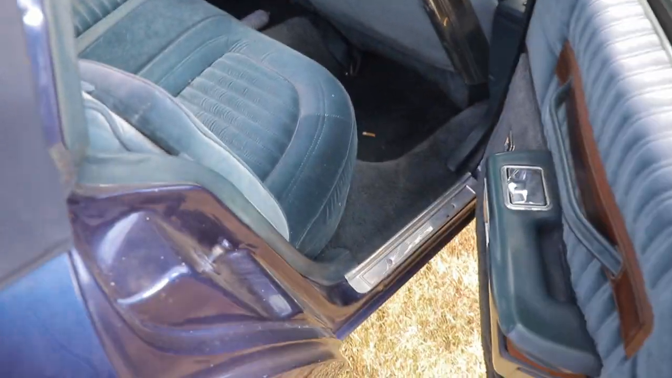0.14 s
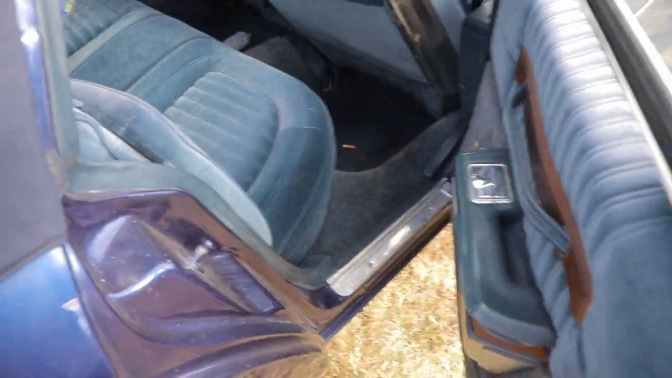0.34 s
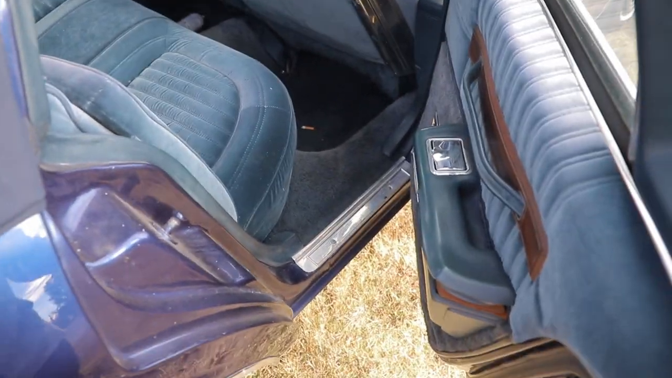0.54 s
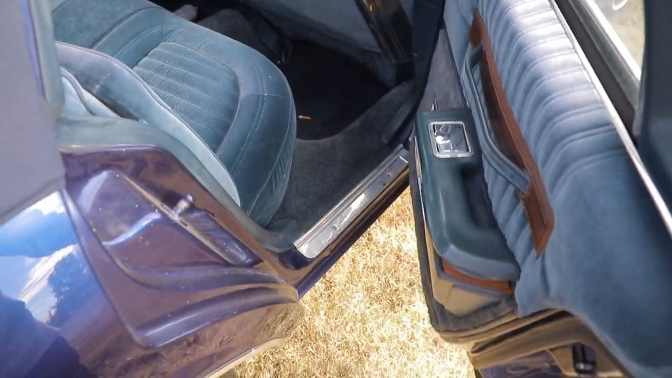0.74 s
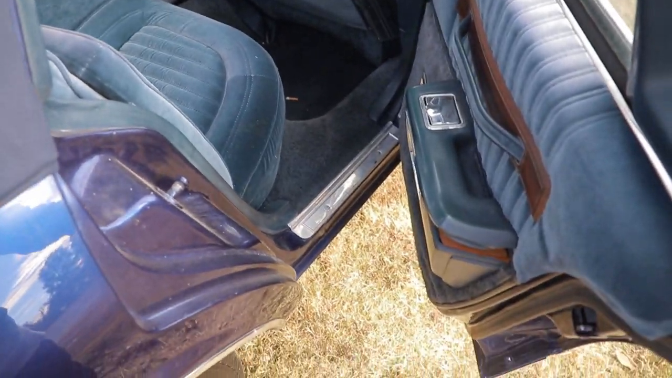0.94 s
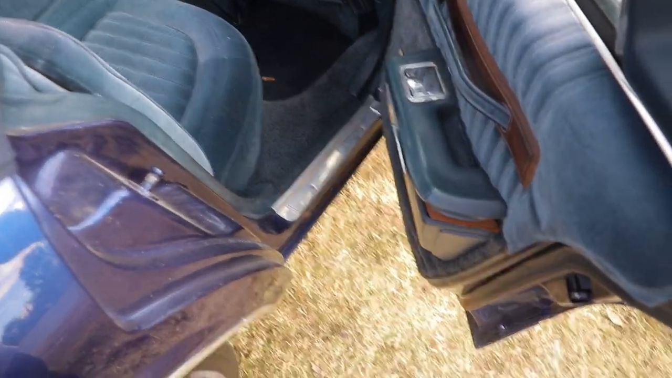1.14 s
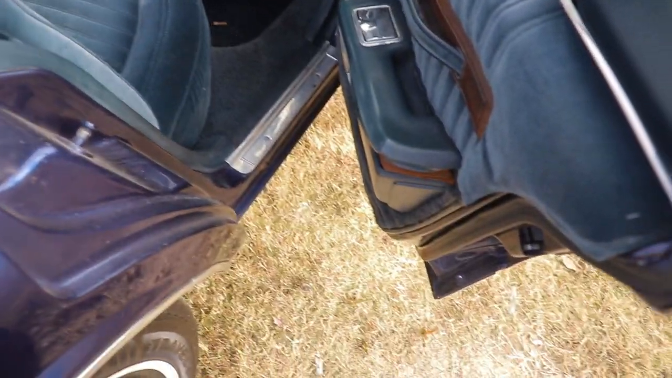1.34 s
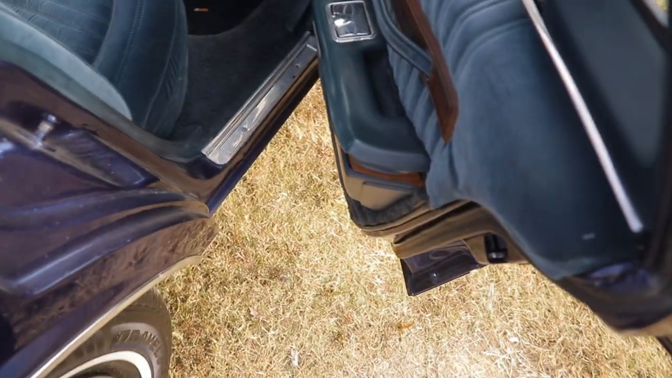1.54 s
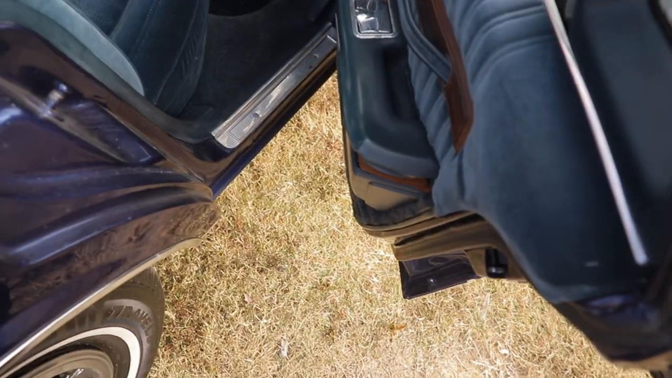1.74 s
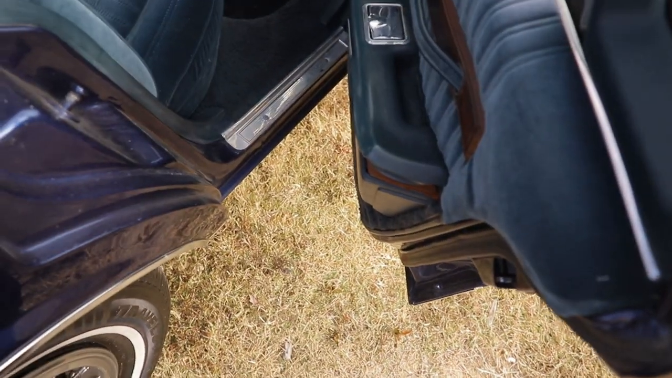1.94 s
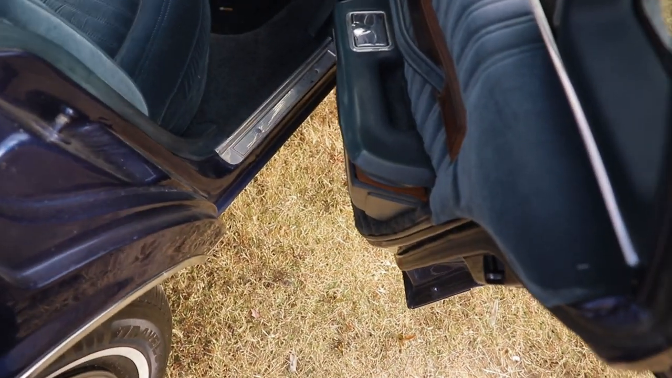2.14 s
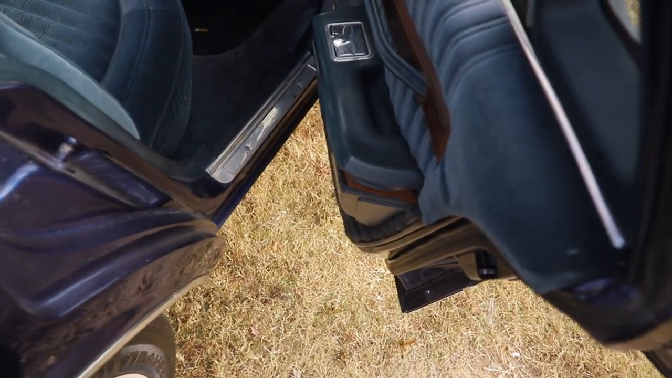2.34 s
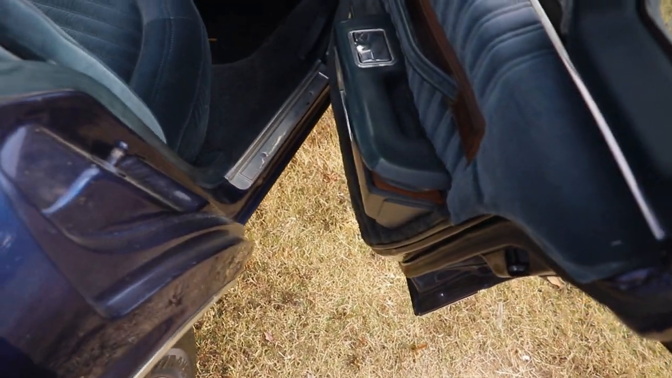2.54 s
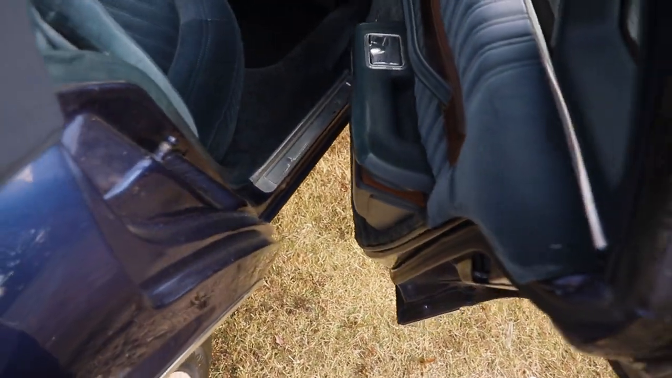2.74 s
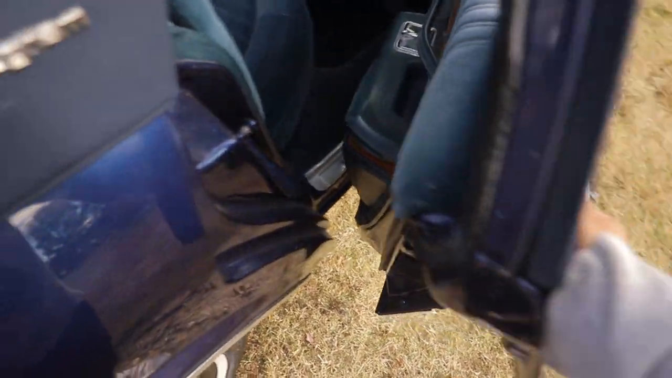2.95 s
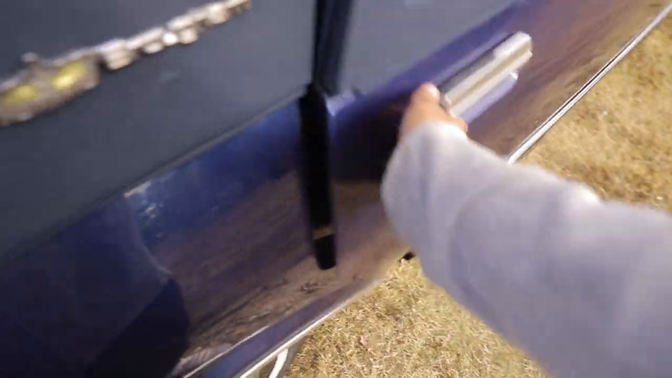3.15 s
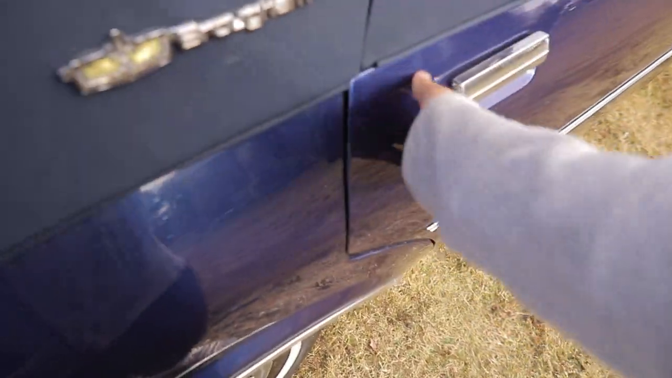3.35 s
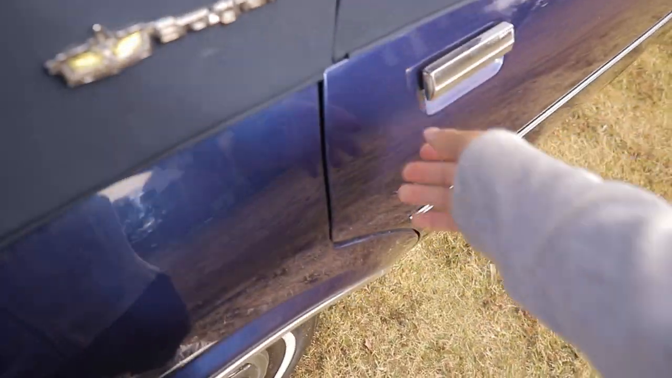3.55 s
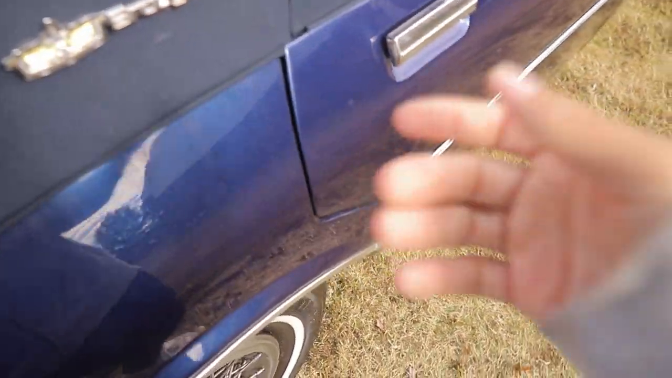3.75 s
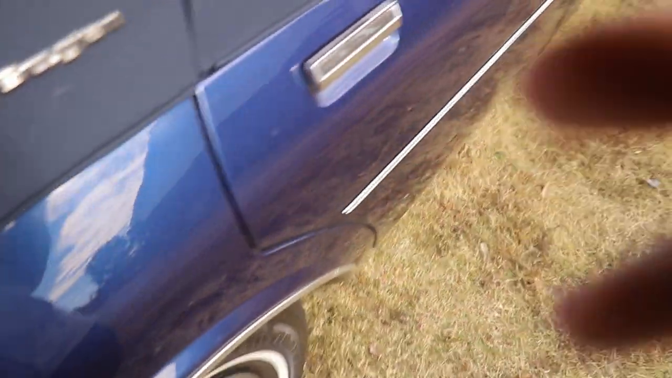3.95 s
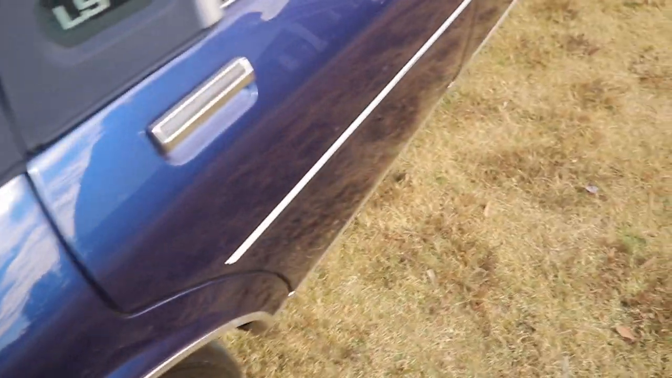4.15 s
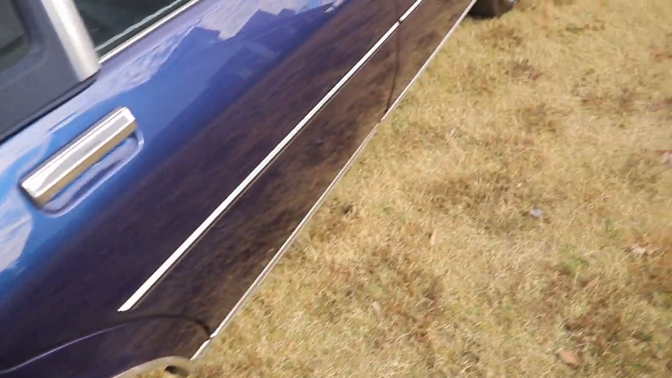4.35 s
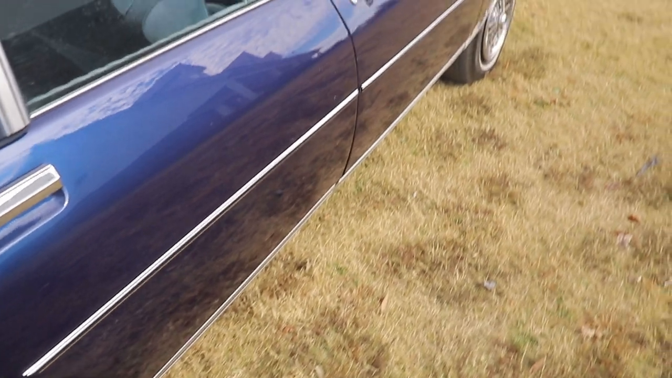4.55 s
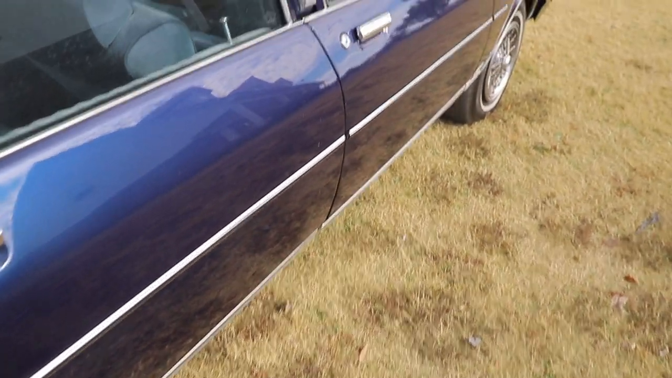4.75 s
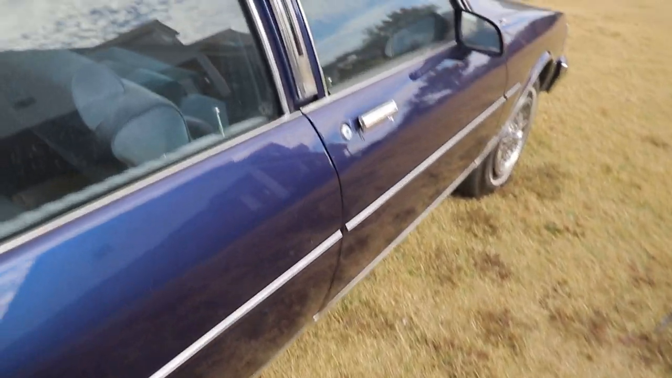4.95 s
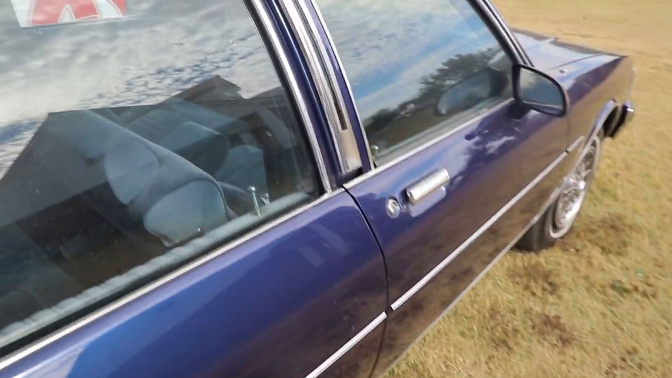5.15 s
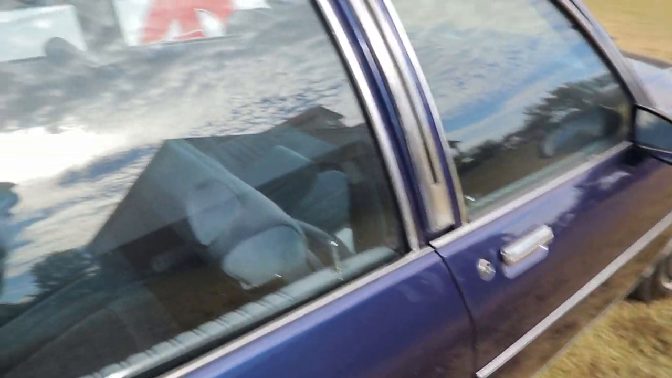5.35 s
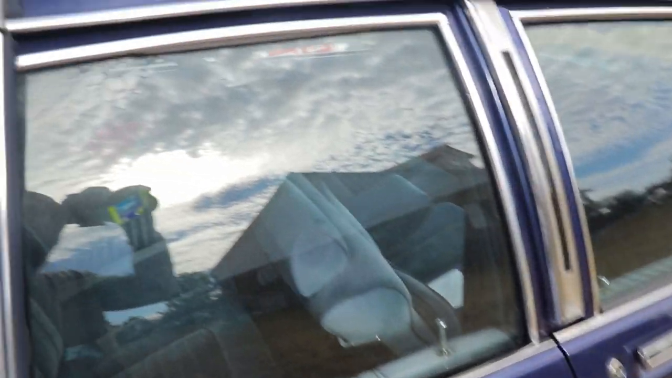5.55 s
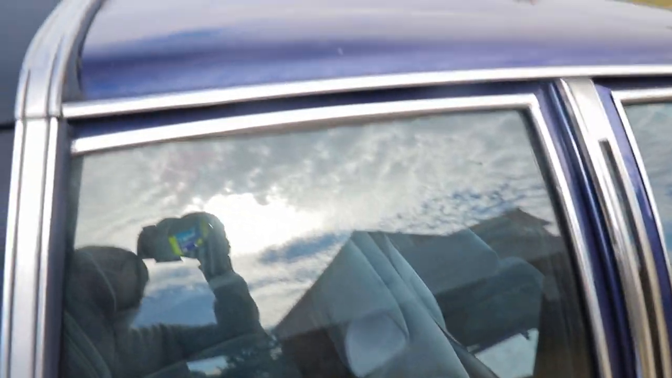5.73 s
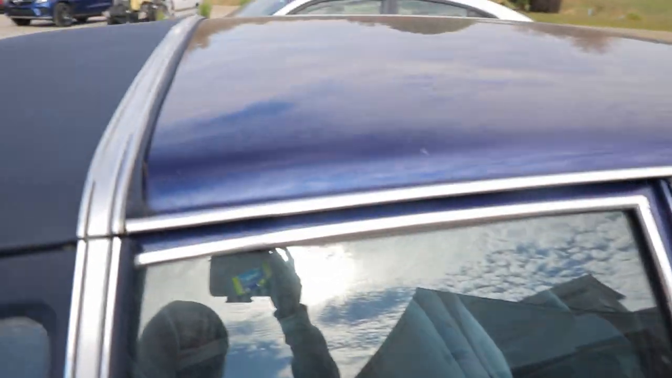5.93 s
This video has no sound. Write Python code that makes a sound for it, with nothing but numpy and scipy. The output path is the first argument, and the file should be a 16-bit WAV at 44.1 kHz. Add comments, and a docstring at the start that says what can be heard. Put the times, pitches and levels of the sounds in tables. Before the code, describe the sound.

A quiet yard with far traffic and leaves, small wind pops on a hand-held microphone, light rubbing and faint sparrow chirps. Just past the middle, a heavy old car door slams close by, overloading with a metallic clash, boomy panel thud and short yard echo. Afterwards come sharp finger knocks, sleeve rubs, stronger wind buffets and a distant bird's small whistles, with a clear chirp at the end.

```python
"""Outdoors, a far hum, traffic and leaves run throughout as steady coloured noise and wavering tones. From the
start a hand rubs a hand-held camera (grainy hiss), wind pops on its two microphone ports (short pressure swings
over rumble), sparrows chirp (fluttering glides) and fingers tap (clicks, case ring). At 3.2 s a heavy old car
door slams close by (noise clashes, panel modes, yard echo); its peaks flatten at full scale. Then a bird
whistles purer slurs, the hand knocks and rubs harder, a sleeve brushes past."""
import sys
import numpy as np
from scipy import signal
from scipy.fft import rfft, irfft, next_fast_len
from scipy.io import wavfile
from scipy.ndimage import uniform_filter1d, map_coordinates

SR = 44100
rng = np.random.default_rng(int(sys.argv[2]) if len(sys.argv) > 2 else 0)


def wav_out(sig):
    """Save sig, one row per channel (or a flat mono array), as 16-bit PCM at SR to the path in sys.argv[1]."""
    wavfile.write(sys.argv[1], SR, np.round(np.clip(np.atleast_2d(sig).T, -1, 1) * 32767).astype(np.int16))


N = 268524
TIME = np.arange(N) / SR  # s, the whole scene
RING = np.arange(SR) / SR  # s, one second for a single sound


def amp(db):
    """Decibels to gain."""
    return 10 ** (np.asarray(db) / 20)


def unit(x):
    """Scale to rms 1."""
    return x / np.sqrt(np.mean(x ** 2) + 1e-20)


def along(points, hz):
    """Read a curve of (Hz, value) points on a log frequency axis."""
    point_hz, value = np.transpose(points)
    return np.interp(np.log(hz + 1), np.log(point_hz + 1), value)


def wobble(rate):
    """A smooth random curve, rate knots a second."""
    knots = rng.standard_normal(int(N * rate / SR) + 4)
    return map_coordinates(knots, [TIME * rate])


def filtered(x, response):
    """Shape x by a response given as a function of frequency in Hz."""
    n = x.shape[-1]
    padded = next_fast_len(n + 8192)
    spectrum = rfft(x, padded) * response(np.fft.rfftfreq(padded, 1 / SR))
    return irfft(spectrum, padded)[..., :n]


def pan(db):
    """Left and right gains of constant power; positive dB leans left."""
    return unit(amp([[db / 2], [-db / 2]]))


def add(track, s, sound):
    """Mix a sound in at s seconds."""
    part = track[:, max(round(s * SR), 0):][:, :sound.shape[-1]]
    part += sound[..., :part.shape[1]]


def noise(spectrum, alike, size=N):
    """Stereo noise of rms 1 with a given colour and left-right likeness."""
    def mid_side_gains(hz):
        turn = np.arccos(np.clip(along(alike, hz), -1, 1)) / 2
        return amp(along(spectrum, hz)) * [np.cos(turn), np.sin(turn)]

    mid, side = filtered(rng.standard_normal((2, size)), mid_side_gains)
    return unit(np.array([mid + side, mid - side]))


def tilted(spectrum, tilt_db):
    """Lean a spectrum by tilt_db per octave about 1 kHz, with no further lean below 250 Hz."""
    return [(hz, level + tilt_db * np.log2(max(hz, 250) / 1000)) for hz, level in spectrum]


def fade(t, t60):
    """Exponential decay, 60 dB in t60."""
    return np.exp(-np.log(1000) * t / t60)


def dying(x, t60s):
    """Let each frequency of x die at its own speed."""
    hz, t, z = signal.stft(x, SR, nperseg=256)
    decayed = z * fade(t, along(t60s, hz)[:, None])
    return signal.istft(decayed, SR, nperseg=256)[1][:, :x.shape[1]]


def ring(modes, scatter_db):
    """Struck modes, starting near rms 1, at new strengths for each blow."""
    hz, db, t60 = np.transpose(modes)[:, :, None]
    sign = rng.choice([-1, 1], db.shape)
    size = sign * amp(db + scatter_db * rng.standard_normal(db.shape))
    partials = size * np.sin(2 * np.pi * hz * RING) * fade(RING, t60)
    return np.sum(partials, 0) * np.sqrt(2) / np.linalg.norm(amp(db))


# distant traffic and leaves, relative spectrum: pitch_hz [Hz], density_db [dB per Hz]
AIR_SPECTRUM = [(15, -58.5), (30, -29.5), (60, -13), (130, -10), (230, -9.5), (330, -12), (500, -11),
                (800, -14), (1300, -15.5), (2500, -15), (5000, -20), (9000, -27), (13000, -35),
                (16000, -41)]
# how alike the far air is at both ports: pitch_hz [Hz], likeness [correlation]
AIR_LIKENESS = [(100, 0.98), (400, 0.88), (1000, 0.18), (3000, 0.025)]
# tones of a far machine: pitch_hz [Hz], mean_level_db [dB]
HUM_TONES = [(227, -68), (301, -77.5), (452, -73.5), (511, -74.5)]


def distance():
    """Far sources blend into steady noise; the machine's tones waver in level and phase."""
    hum = 0
    for hz, db in HUM_TONES:
        phase = 2 * np.pi * hz * TIME + 0.65 * wobble(1.3)
        hum = hum + amp(db + 2 * wobble(16)) * np.sqrt(2) * np.sin(phase)
    air = amp(-57.5 + 1.2 * wobble(4.6)) * noise(AIR_SPECTRUM, AIR_LIKENESS)
    return hum + air


# skin and sleeve slide on the camera: start_s [s], end_s [s], level_db [dB], tilt_db [dB per octave],
# hollow_share [share of the hollows' dB], left_over_right_db [dB]
RUB_STROKES = [(0, .11, -60, 1, .26, -4.5), (0.46, 0.505, -50, -2, 0.16, -1),
               (0.654, 0.715, -54.5, -2, .9, -8.5), (2.339, 2.365, -50.5, 1, 0.14, 0),
               (2.467, 2.595, -60, 1, .25, -6), (3.028, 3.199, -57, 0.5, 0.16, -2.5),
               (3.19, 3.249, -50, -5, .3, -3.5), (3.942, 3.972, -33, -3, 0.69, -1),
               (3.977, 4.005, -34.5, 1.5, 1.4, -4), (4.01, 4.066, -42.5, 1.5, 1.71, -4),
               (4.127, 4.168, -47.5, 2, 0.335, -22), (4.167, 4.178, -33.5, -2.5, 0.63, -4.5),
               (4.184, 4.199, -35.5, 1.5, 0.86, -12.5), (4.2947, 4.34, -41, .5, .5, -11.5),
               (4.343, 4.4, -53, -1.5, 0.41, -3.5), (4.393, 4.478, -43, -0.5, .4, 2.5),
               (4.483, 4.596, -50.5, 0, .5, 2.5), (4.601, 4.666, -46, 0, 0.33, -5),
               (4.663, 4.733, -47, 4, .1, -1.5), (5.622, 5.672, -54, 0, .3, 0.5),
               (5.776, 5.901, -58, 2.5, .2, 1)]
# friction hiss, relative spectrum before each stroke's tilt: pitch_hz [Hz], density_db [dB per Hz]
CLOTH_SPECTRUM = [(100, -21), (600, 1), (1500, 0), (2400, -0.5), (3400, 0), (5500, -5.5), (9000, -10),
                  (11500, -16), (16000, -25.5)]
# hollows of the hand and case, scaled by hollow_share: pitch_hz [Hz], width_hz [Hz], boost_db [dB]
HAND_HOLLOWS = [(660, 320, 5.5), (1570, 130, 11), (1900, 56, 10), (3000, 300, 6), (3655.4, 370, 4.5),
                (4750, 300, 7), (7100, 700, 5.5), (8400, 460, 4)]


def rubs():
    """Friction hiss, grainy as the fibres catch and hollow where the hand cups the case."""
    out = np.zeros((2, N))
    t = RING[:SR // 2]

    def hollow_db(f):
        return sum(db / (1 + (2 * (f - hz) / width) ** 2) for hz, width, db in HAND_HOLLOWS)

    for start, end, db, tilt_db, share, side_db in RUB_STROKES:
        hiss = noise(tilted(CLOTH_SPECTRUM, tilt_db), [(500, .4), (3000, 0.00846)], size=len(t))
        grain = unit(uniform_filter1d(rng.standard_normal(len(t)), size=60))
        voiced = filtered(hiss * amp(1.2 * grain), lambda hz: amp(share * hollow_db(hz)))
        length = max(end - start, .005)
        onset = 1 - np.exp(-t / (0.035 * length))
        release = fade(np.maximum(t - length, 0), .02 + .6 * length)
        add(out, start, amp(db) * pan(side_db) * onset * release * unit(voiced))
    return out


EDDY_HALF_S = .02  # half the time kept for one eddy


def eddy(hz, side_db):
    """One swing of pressure with a peak near 1; the windward port is hit first and harder."""
    crossing_s = 0.00034 * np.sign(side_db) * np.array([[1], [-1]])
    cycles = (RING[:round(2 * EDDY_HALF_S * SR)] - EDDY_HALF_S + crossing_s) * hz
    swing = np.cos(2 * np.pi * cycles + rng.uniform(0, 2 * np.pi))
    return pan(side_db) * swing / np.cosh(cycles / .27)


# gusts on the ports: start_s [s], end_s [s], strength_db [dB], eddy_pitch_hz [Hz, middle of a spread],
# left_over_right_db [dB, middle of a spread]
GUST_TABLE = [(.025, 0.087, -43, 330, 7), (.345, .7, -42.5, 250, 5), (0.964, 1.5, -61, 185, 1.5),
              (2.388, 2.6, -45, 157, 9), (2.839, 3.19, -50, 240, -3.5), (3.691, 3.8, -42.5, 260, -12.5),
              (4.002, 4.12, -33.5, 301.1, -7), (4.181, 4.21, -47, 280, 0), (4.521, 4.635, -40, 258.5, -5.5),
              (4.653, 4.771, -30, 372, -7.5), (4.801, 4.869, -43, 215, -6), (4.998, 5.04, -42.5, 215, 5),
              (5.136, 5.165, -32, 260, 14), (5.226, 5.3, -40.5, 271, 4), (5.605, 5.63, -52, 350, 7.5),
              (5.921, 5.943, -42.5, 238.6, 7), (6.069, 6.09, -31.5, 390, 5)]
GUST_RISE_S, GUST_FALL_S, CALM_DB = 0.0234, .035, -67  # time constants of a gust's edges; air between gusts


def gusts():
    """Air strength in dB over calm: every gust rises, holds and dies away."""
    power = np.ones(N)
    for start, end, db, _, _ in GUST_TABLE:
        before = np.maximum(start - TIME, 0) / GUST_RISE_S
        after = np.maximum(TIME - end, 0) / GUST_FALL_S
        power += amp(db - CALM_DB) ** 2 * np.exp(-2 * np.minimum(before + after, 20))
    return 10 * np.log10(power)


# the largest eddies pop on the ports: centre_s [s], peak_db [dB before the low cut], pitch_hz [Hz],
# left_over_right_db [dB]
LARGE_EDDIES = [(.326, -18, 322, 12), (.79, -19, 211.4, 10), (.84, -16.5, 213, 9), (2.416, -24, 106, 2),
                (2.478, -25.5, 192, 10.5), (2.57, -20, 200, 14), (3.17, -29, 257, -6),
                (3.806, -24, 183, -7), (4.054, -18.5, 242.5, -5), (4.106, -15, 233, -13),
                (4.667, -4, 497, -13.5), (4.704, -24, 460, -15), (4.771, -21, 370, -15.5),
                (5.153, -15.5, 268, 13), (5.325, -26.5, 376, 12), (5.989, -26, 258, 6),
                (6.061, -16.5, 404, 14)]
# low rumble of the wind, relative spectrum: pitch_hz [Hz], density_db [dB per Hz]
RUMBLE_SPECTRUM = [(20, -19.5), (50, -8), (110, -0.5), (230, -1), (380, -9), (600, -15.5), (1000, -33.5),
                   (2500, -60), (6000, -100)]
RUMBLE_DB, RUMBLE_GROWS = -63, 0.61  # mean level in calm air before the low cut; dB gained per dB of gust
EDDY_GAP_S, EDDY_JITTER = .019, 0.3008  # gap between eddies; timing spread as a share of it
EDDY_SPREAD_OCTAVES = 0.34  # spread of pitch
EDDY_DB, EDDY_SCATTER_DB, EDDY_SIDE_DB = 12, 3.5, 4  # peak over the gust; spread of size, and between ports


def wind():
    """Each gust sheds an uneven train of eddies over a low rumble; a few large ones pop."""
    rumble = noise(RUMBLE_SPECTRUM, [(100, 0.79), (600, 0.75)])
    out = rumble * amp(RUMBLE_DB + RUMBLE_GROWS * gusts() + 3.8 * wobble(24))
    for s, db, hz, side_db in LARGE_EDDIES:
        add(out, s - EDDY_HALF_S, amp(db) * eddy(hz, side_db))
    for start, end, db, hz, side_db in GUST_TABLE:
        chance = rng.standard_normal(size=(40, 4))
        for k, (late, size, pitch, side) in enumerate(chance):
            s = start + (k + EDDY_JITTER * late) * EDDY_GAP_S
            if s < end:
                swing = eddy(hz * 2 ** (EDDY_SPREAD_OCTAVES * pitch), side_db + EDDY_SIDE_DB * side)
                add(out, s - EDDY_HALF_S, amp(db + EDDY_DB + EDDY_SCATTER_DB * size) * swing)
    low_hz = 70  # the wind keeps little deep bass
    return filtered(out, lambda hz: hz ** 2 / (hz ** 2 + low_hz ** 2))


def song(notes, voices, crest, buzz, buzz_hz, scatter_db, echo_db):
    """Notes arch over a top pitch, roughened by fast flutter, smeared by branches, echoed by the yard."""
    out = np.zeros((2, N))
    for s, length, db, top_hz, fall in notes:
        u = np.linspace(0, 1, max(round(length * SR), 16))  # share of the note passed
        flutter = np.sin(2 * np.pi * buzz_hz * length * u + rng.uniform(0, 2 * np.pi))
        glide = top_hz * 2 ** (-fall * np.abs((u - crest) / (1 - crest)) ** 1.5)
        swell = np.sin(np.pi * u ** 0.72) * (1 + .43 * buzz * flutter)
        for ratio, voice_db in voices:
            jitter = unit(uniform_filter1d(rng.standard_normal(SR // 4), size=24))[:len(u)]
            hz = ratio * glide * (1 + buzz * (.03 * flutter + 0.058 * jitter))
            tone = np.sin(2 * np.pi * np.cumsum(hz) / SR)
            add(out, s, amp(db + voice_db) * swell * tone)
    branches = unit(rng.standard_normal((2, SR)) * fade(RING, 0.048))
    yard = unit(rng.standard_normal((2, SR)) * fade(RING, .49) * (1 - np.exp(-RING / .04)))
    tail = (amp(scatter_db) * branches + amp(echo_db) * yard) / np.sqrt(SR)
    return out + signal.fftconvolve(out, tail, axes=1)[:, :N]


# sparrow chirps: start_s [s], length_s [s], level_db [dB before voice level and flutter],
# top_pitch_hz [Hz before jitter], fall_octaves [octaves]
SPARROW_CHIRPS = [(.195, .016, -61, 5100, 0.048), (.56, 0.07, -61, 4516, 0.14),
                  (1.96, 0.1, -60, 4500, 0.052), (2.745, 0.11, -55, 4850, 0.66),
                  (2.86, 0.12, -58, 4624, 0.28), (3.615, .11, -58.5, 4610, .1),
                  (5.06, 0.057, -53.5, 4610, 0.72), (5.977, 0.054, -35.5, 4818, 0.44),
                  (6.007, 0.026, -43.5, 3204, .8)]
# a sparrow's main tone, side tones and overtone: pitch_ratio [ratio], voice_db [dB]
SPARROW_VOICES = [(1, 0.5), (1.2, -8.5), (.72, -8), (2, -21)]


def sparrows():
    """Buzzy falling chirps: several tones flutter together in pitch and level."""
    crest = 0.12  # share of a note before its highest pitch
    return song(SPARROW_CHIRPS, SPARROW_VOICES, crest, buzz=.9, buzz_hz=166, scatter_db=-2.5, echo_db=-3.5)


# fingers tap the camera: start_s [s], level_db [dB], centre_hz [Hz], t60_s [s],
# case_ring_db [dB re 7.5 dB below the click], left_over_right_db [dB]
FINGER_TAPS = [(.337, -45, 1270, 0.037, 3, 0.5), (2.576, -43, 1510, 0.088, -20, -8),
               (2.93, -39.5, 1220, .066, -8.5, 1), (3.9369, -13.5, 2050, 0.026, 1.5, -3.5),
               (3.963, -21.5, 4380, 0.015, 0, -2), (4.125, -15.5, 1010, 0.0088, -18.5, -11),
               (4.4223, -19.5, 3930, 0.015, -10, -12), (4.4532, -23, 4330, 0.008, -29, 10),
               (4.4721, -30.5, 2970, 0.016, -9, 11), (4.5496, -28.5, 3160, .013, -2.5, 6),
               (4.7952, -32, 2160, 0.014, -2.5, -10), (4.9064, -37.5, 2270, 0.0126, -2.5, -5),
               (5.049, -44.5, 5510, 0.0091, -23.5, 12)]
# ringing modes of the camera case: pitch_hz [Hz], mean_level_db [dB, relative], t60_s [s]
CASE_MODES = [(1383, -2.5, 0.054), (1570, -2.5, 0.041), (1898, 4, 0.022), (2110, -12, 0.043),
              (2682.6, -31, .035), (3716, -38, 0.03646)]


def taps():
    """A short broad click and a little ring of the camera case."""
    out = np.zeros((2, N))
    for s, db, centre_hz, t60, case_db, side_db in FINGER_TAPS:
        colour = [(centre_hz / 8, -14), (centre_hz, 0), (centre_hz * 2.67, -12), (centre_hz * 8, -36)]
        click = noise(colour, [(500, 0.7), (4000, 0.1524)], size=SR) * fade(RING, t60)
        case = np.array([ring(CASE_MODES, scatter_db=2.5), ring(CASE_MODES, scatter_db=1.0)])
        add(out, s, amp(db) * pan(side_db) * (click + amp(case_db - 7.5) * case))
    return out


# door meets latch, striker and frame, then glass and rods rattle: start_s [s],
# level_db [dB before the bass cut], tilt_db [dB per octave], decay_share [share of the clash t60]
SLAM_CONTACTS = [(3.2448, -3, -2, 0.66), (3.261, 6.5, 1.63, 0.61), (3.2704, -0.5, 0.5, 0.7),
                 (3.283, -2, 0, 0.48), (3.289, -8.5, -2.5, 0.46), (3.307, -19.5, -3, 0.55),
                 (3.3223, -13.5, -6.5, 0.67), (3.346, -26.5, -3.5, 1), (3.362, -27, -5.5, 0.87),
                 (3.392, -34, -4, 1)]
# latch, glass and trim, relative spectrum before tilt: pitch_hz [Hz], density_db [dB per Hz]
CLASH_SPECTRUM = [(40, -34.5), (170, -19), (400, -2), (1000, -3), (2500, -5), (4000, -9.5), (7000, -10),
                  (10000, -18), (16000, -32)]
# clash decay before decay_share: pitch_hz [Hz], t60_s [s]
CLASH_DECAY = [(200, 0.34), (1000, .18), (2500, .15), (6000, .12), (14000, 0.13)]
# how alike the clash is at both ports: pitch_hz [Hz], likeness [correlation]
CLASH_LIKENESS = [(200, 0.956), (1000, 0.68), (3500, 0.55), (9000, 0.085)]
# door skin and cabin modes: pitch_hz [Hz], mean_level_db [dB, relative], t60_s [s]
PANEL_MODES = [(61.93, -23.5, .4), (83.4, -13.5, 0.26), (131, -11.5, 0.25), (184.5, 1.5, .19),
               (230.3, 2, 0.17), (277.4, -2, .24), (342, -3, .22), (363, 1, .27), (409.6, 0, 0.3),
               (463, -3, .27), (585, -5, 0.17), (693.39, -3.5, 0.22), (746, -4.5, .19), (950, -3.5, .19),
               (1000, -5, .17), (1084, -4.5, .19), (1222, -6, 0.12), (1487, -6.5, 0.12), (1753, -12, .2),
               (2466, -11, 0.14)]
# air pushed into the cabin, relative spectrum: pitch_hz [Hz], density_db [dB per Hz]
PUFF_SPECTRUM = [(20, -7.5), (45, -3.5), (90, -1), (170, -1.5), (350, -7), (800, -30), (3000, -80.5)]
# echo decay off house walls and trees: pitch_hz [Hz], t60_s [s]
YARD_DECAY = [(100, 0.92), (400, .6), (1500, .48), (5000, .42), (12000, 0.48)]
# echo, relative spectrum: pitch_hz [Hz], level_db [dB]
YARD_SPECTRUM = [(40, -12), (150, -4), (400, -3), (1000, -4.5), (2500, -9), (7000, -15), (11000, -26),
                 (16000, -42.5)]


def door():
    """Contacts clash small parts; the main blow also rings big panels, and the yard answers it."""
    out = np.zeros((2, N))
    for s, db, tilt_db, decay in SLAM_CONTACTS:
        clash = noise(tilted(CLASH_SPECTRUM, tilt_db), CLASH_LIKENESS, size=SR // 2)
        clash = dying(clash, [(hz, decay * t60) for hz, t60 in CLASH_DECAY])
        onset = 1 - np.exp(-RING[:SR // 2] / 0.00031)
        add(out, s, amp(db) * pan(-1.4) * clash * onset)
    small_hz = 230  # small parts radiate little bass
    out = filtered(out, lambda hz: hz ** 3 / (hz ** 3 + small_hz ** 3))
    blow = SLAM_CONTACTS[1][0]
    panel = ring(PANEL_MODES, scatter_db=4.5) * (1 - np.exp(-RING / 0.0041))  # rubber seal softens the push
    add(out, blow, amp(-1.5) * pan(1.5) * panel)
    puff = noise(PUFF_SPECTRUM, CLASH_LIKENESS, size=SR) * fade(RING, 0.15)
    add(out, blow, amp(-14.0) * puff)
    echo = dying(noise(YARD_SPECTRUM, AIR_LIKENESS, size=SR), YARD_DECAY) * (1 - np.exp(-RING / .02))
    add(out, blow, amp(-21.0 + 2 * wobble(130)[:SR]) * echo)  # separate walls make the answer uneven
    lead_s = .00005  # the door is nearer the right port
    return filtered(out, lambda hz: np.exp(1j * np.pi * hz * lead_s * np.array([[-1], [1]])))


# a farther bird: start_s [s], length_s [s], level_db [dB before flutter],
# note_hz [Hz, the top pitch is 0.97 of it before jitter], fall_octaves [octaves]
WHISTLE_NOTES = [(3.52, 0.0884, -56.5, 2340, .02), (3.795, 0.0399, -54.5, 2880, 0.38),
                 (4.82, 0.056, -57, 2190, .1), (4.915, 0.0452, -59, 2600, .02),
                 (5.035, 0.0423, -62, 3160, 0.304), (5.07, 0.063, -60.5, 2200, 0.17),
                 (5.17, 0.0508, -50.5, 2633, 0.048), (5.245, .04, -60.5, 2652, 0.0103),
                 (5.497, 0.041, -49.5, 2960, 0.555), (5.735, 0.066, -52, 2664, 0.692)]


def whistler():
    """Purer slurs: a single tone with less flutter."""
    crest = 0.26  # share of a note before its highest pitch
    return song(WHISTLE_NOTES, [(0.97, 0)], crest, buzz=0.47, buzz_hz=91.36, scatter_db=0.5, echo_db=-1)


def scene():
    """Everything that reaches the two ports."""
    return distance() + rubs() + wind() + sparrows() + taps() + door() + whistler()


def record(dry):
    """Peaks flatten at full scale, then a steep low-pass removes the top of the treble."""
    top_hz = 16000
    clipped = np.clip(dry, -1, 1)
    return filtered(clipped, lambda hz: 1 / np.sqrt(1 + (hz / top_hz) ** 80))


dry = scene()
out = record(dry)
wav_out(out)
```